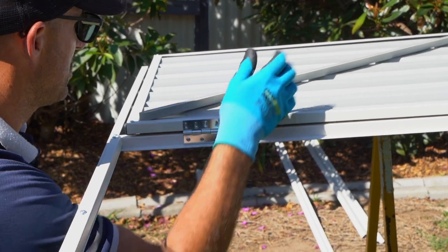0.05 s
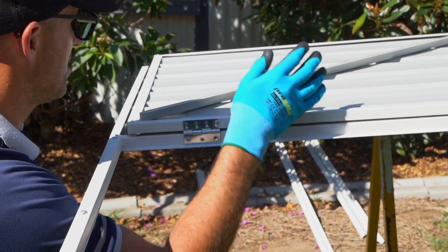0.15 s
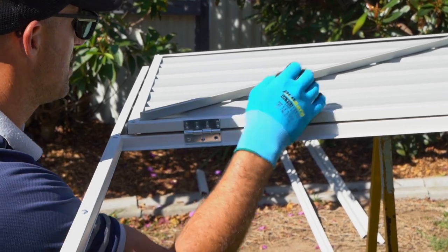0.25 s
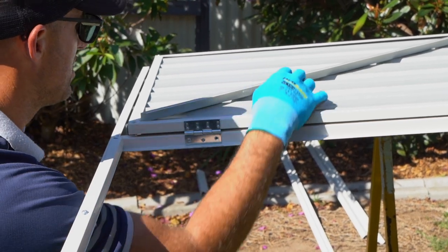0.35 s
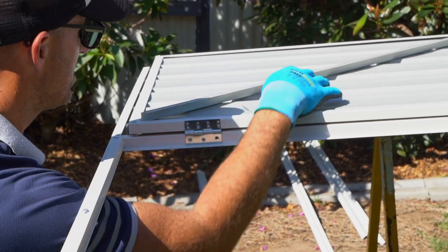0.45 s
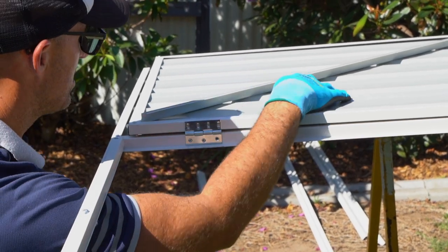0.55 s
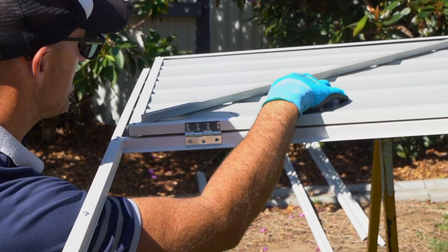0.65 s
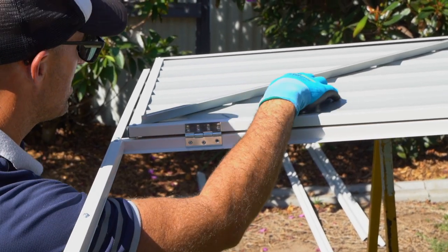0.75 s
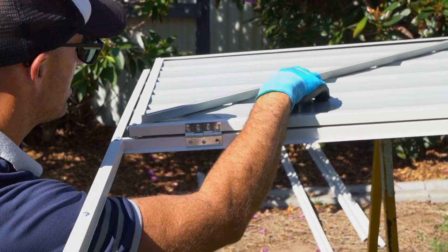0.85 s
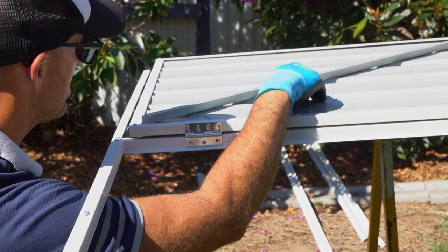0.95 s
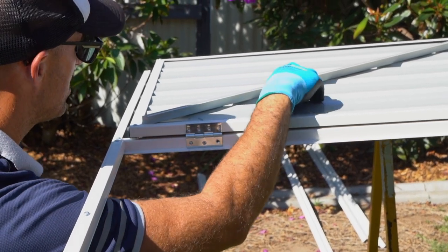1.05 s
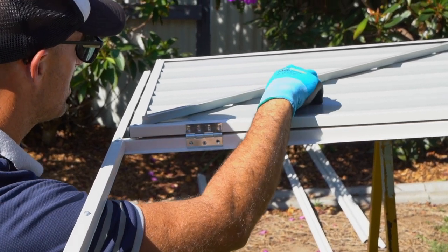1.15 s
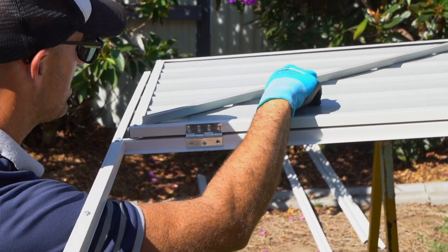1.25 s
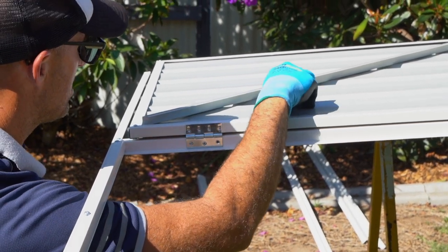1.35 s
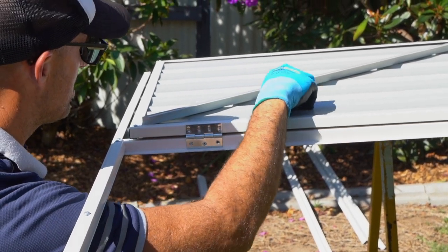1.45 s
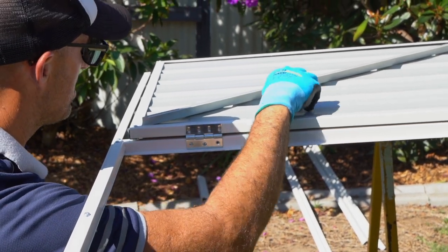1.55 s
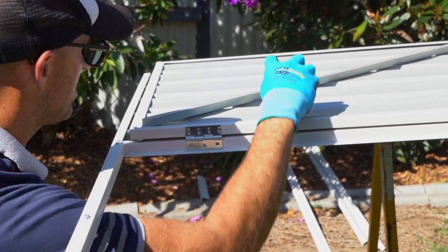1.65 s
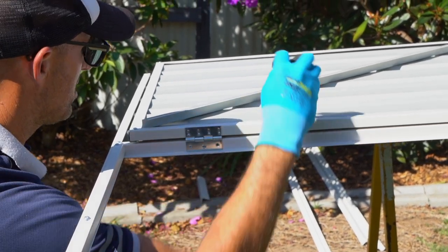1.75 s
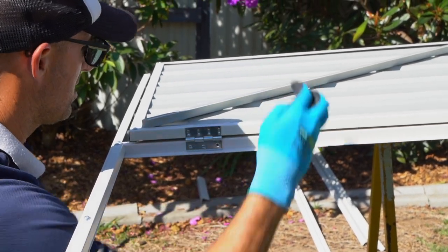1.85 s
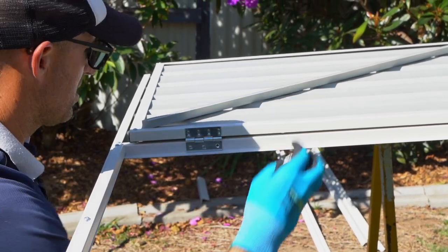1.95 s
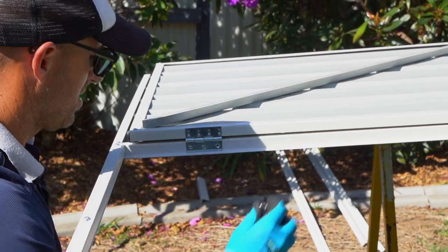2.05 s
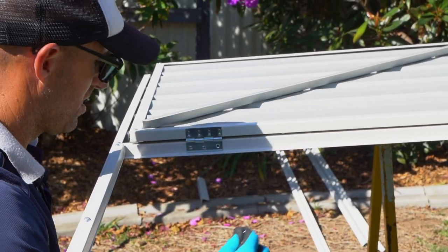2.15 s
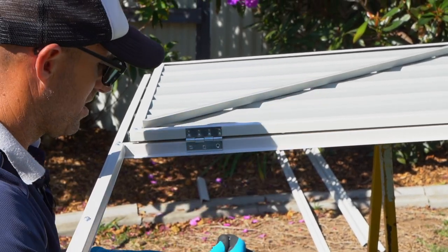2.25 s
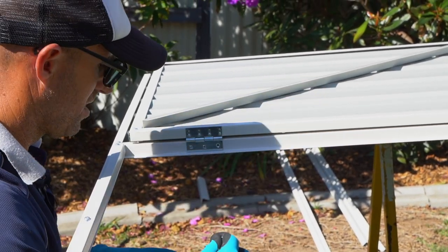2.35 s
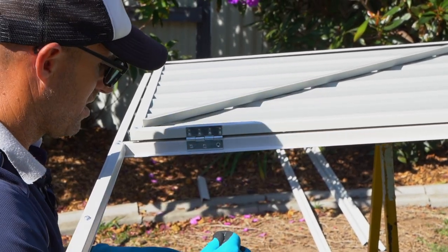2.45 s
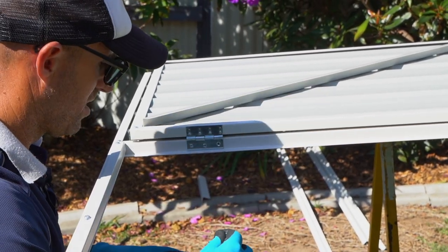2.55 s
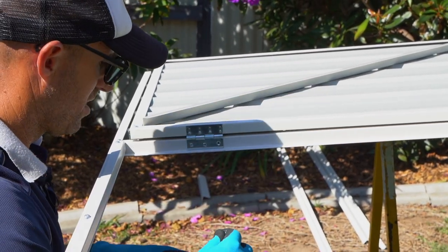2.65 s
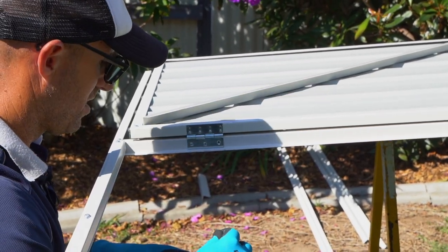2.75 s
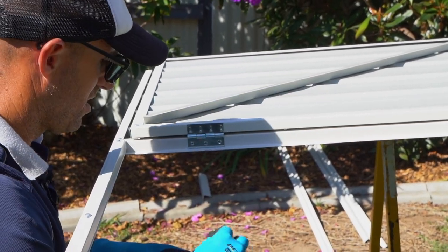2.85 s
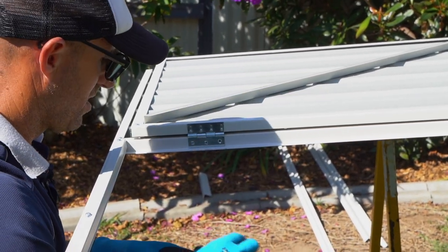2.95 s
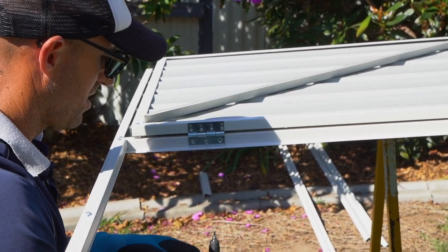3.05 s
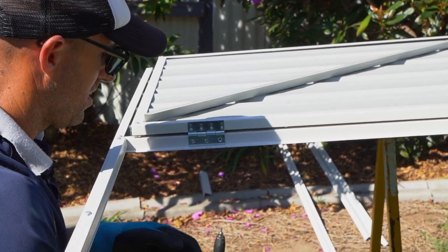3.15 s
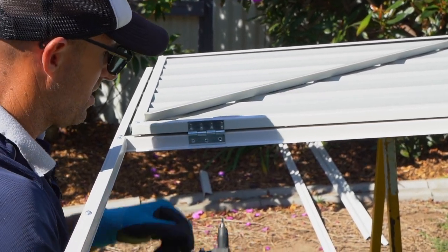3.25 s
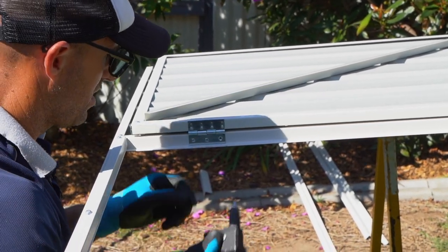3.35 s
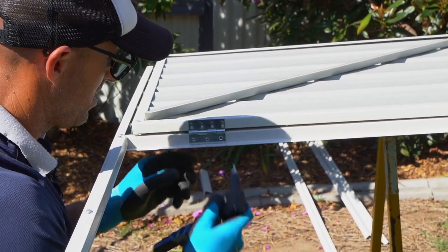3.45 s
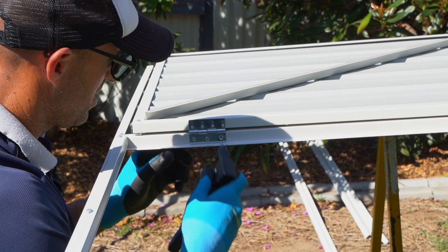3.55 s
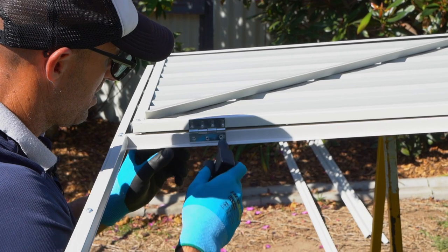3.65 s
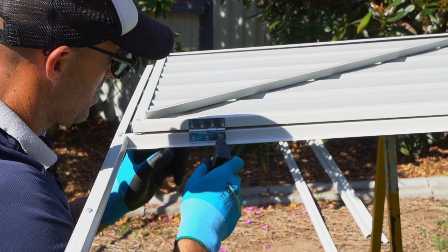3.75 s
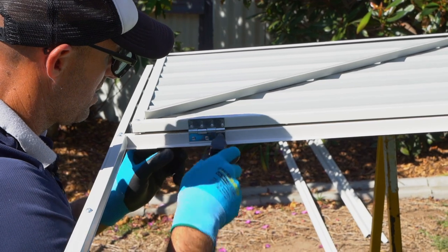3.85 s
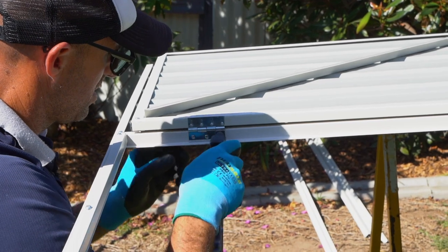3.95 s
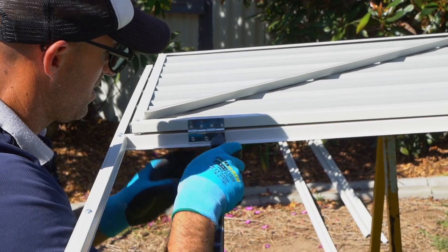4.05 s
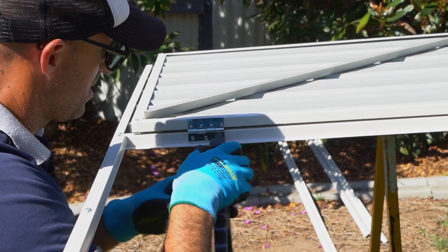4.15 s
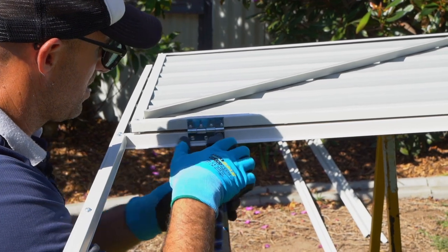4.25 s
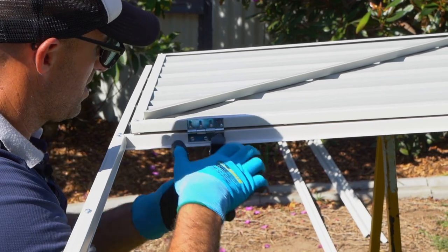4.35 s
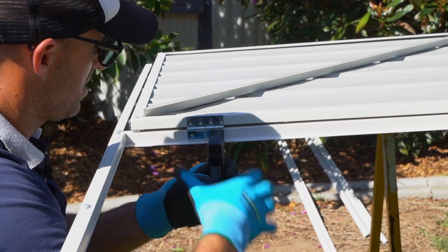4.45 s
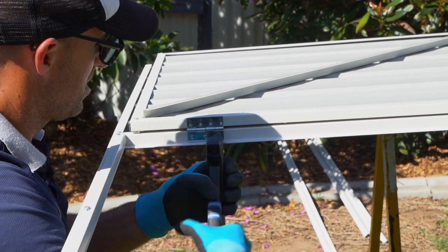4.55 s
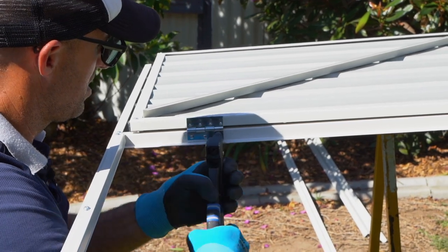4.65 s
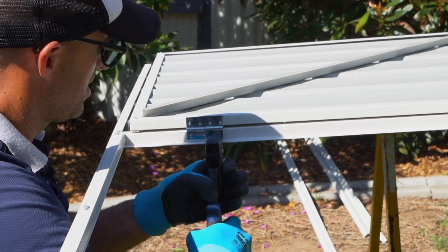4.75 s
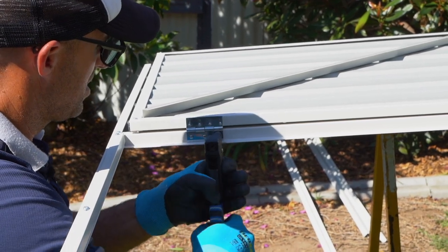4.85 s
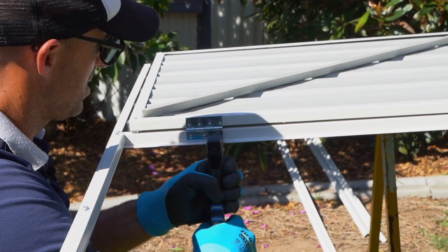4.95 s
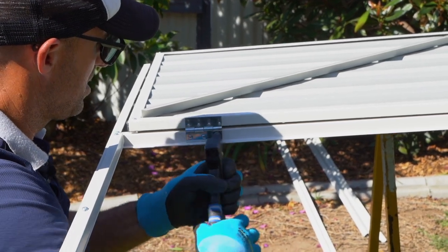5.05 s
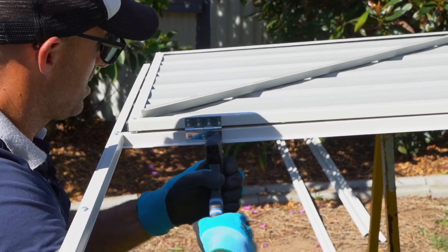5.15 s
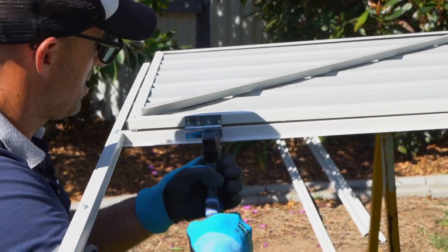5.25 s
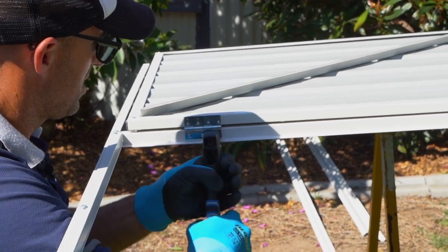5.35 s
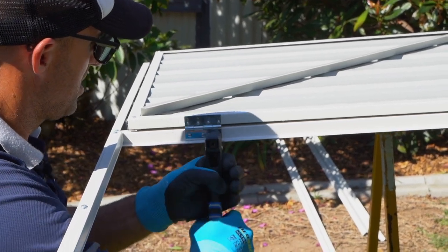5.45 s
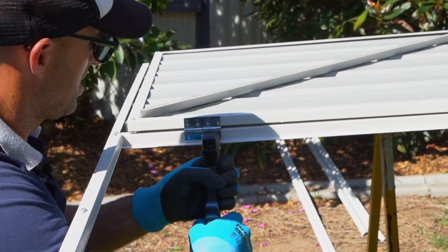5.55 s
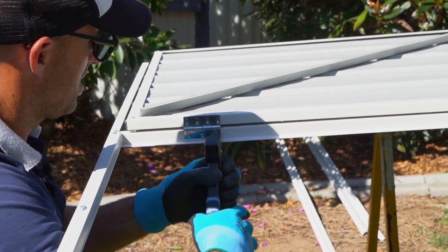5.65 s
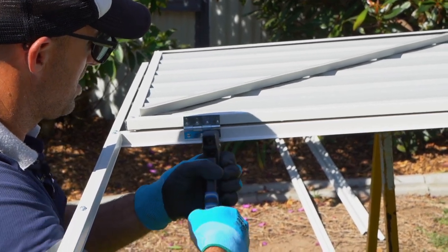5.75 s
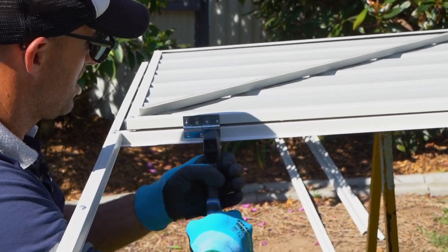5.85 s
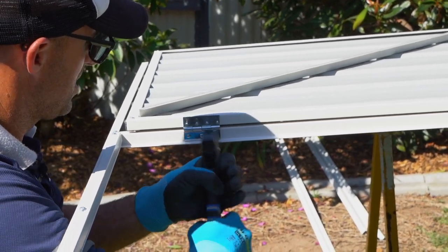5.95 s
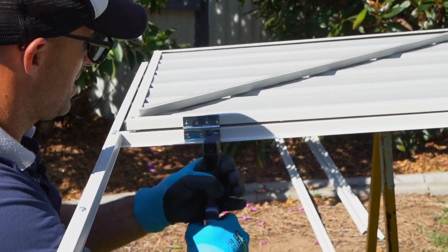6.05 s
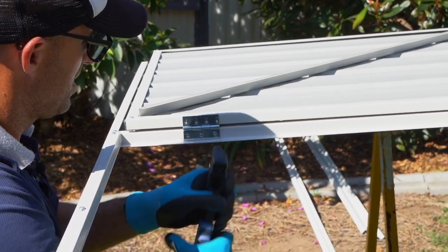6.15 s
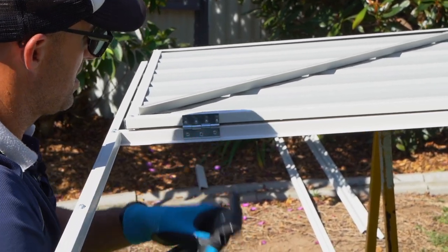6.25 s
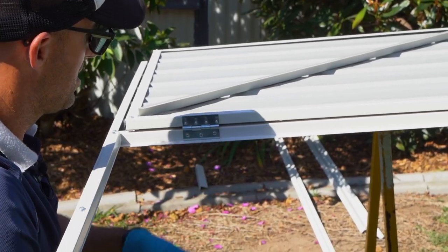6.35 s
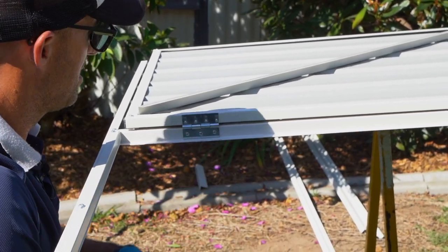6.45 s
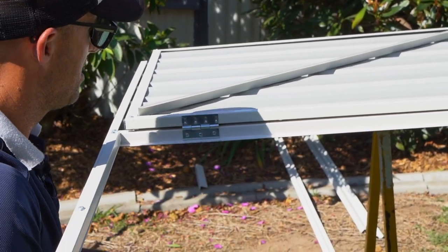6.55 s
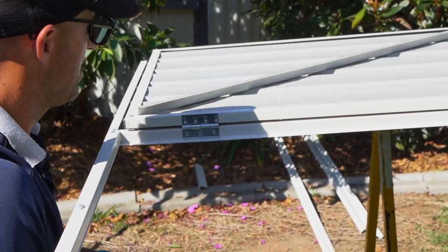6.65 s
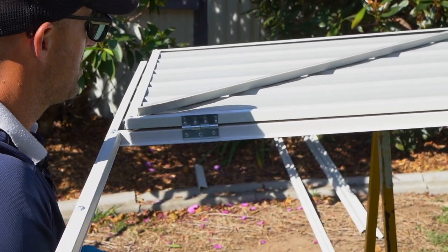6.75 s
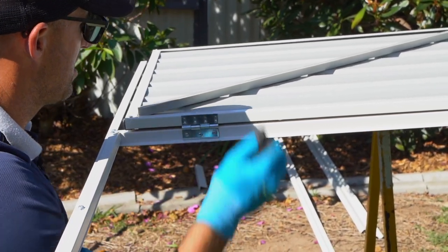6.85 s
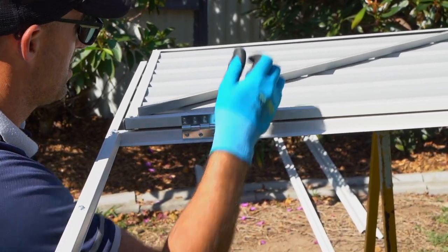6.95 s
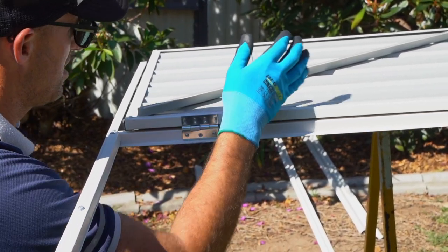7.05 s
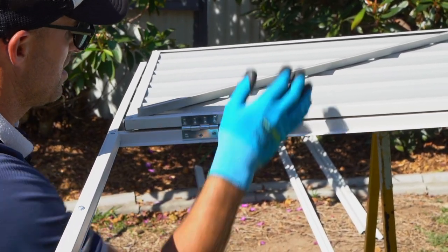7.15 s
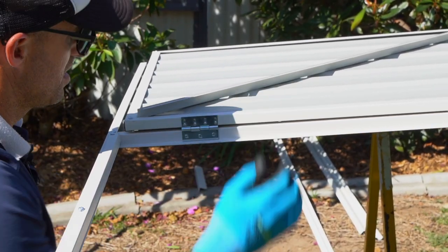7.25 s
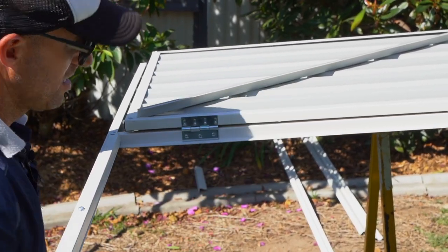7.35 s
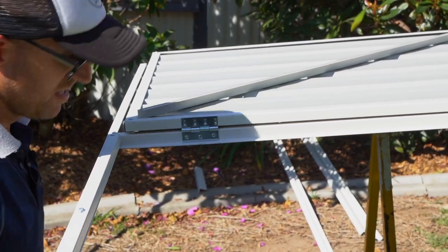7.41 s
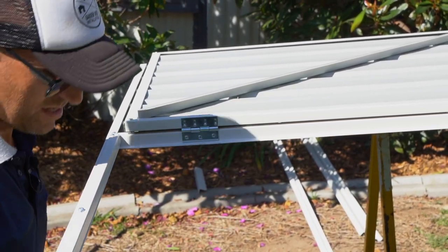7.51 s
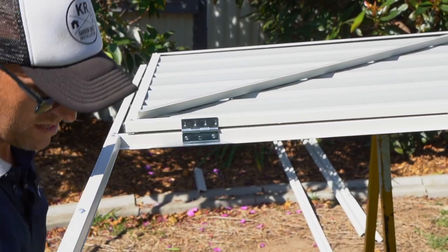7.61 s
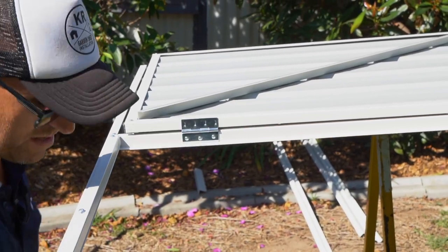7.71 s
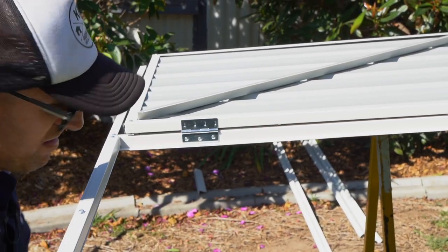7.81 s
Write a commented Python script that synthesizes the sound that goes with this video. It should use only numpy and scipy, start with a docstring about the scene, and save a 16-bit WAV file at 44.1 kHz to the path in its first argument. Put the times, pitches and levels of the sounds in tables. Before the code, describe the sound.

Quiet outdoor air with a low rumble, heard close in mono. From 0.55 to 1.6 s small metal taps, crisp and thinly ringing, land on a sheet panel with faint scraping; a short rasp and clink at 1.7 s lift the rivet away. Near silence follows, with a barely audible distant tone around 2.6 s. At 3.2 s a pin ticks and drops into a steel nose piece, bouncing fast; a bright tool click comes at 3.6. From 3.95 s soft knocks, dull creaks and jaw clicks appear, growing denser and stronger from 5.3 to 6.1 s with brief rattling. At 6.22 s a violent, very short crack overloads the microphone, distorting and choking momentarily as the panel rings. Rattles, knocks and bright clicks follow until 6.7 s, then soft glove rubbing. At 7.45 s a small piece clacks onto the sheet, taps again and slides faintly to the end, near 8 s.

```python
"""Outdoors at a sheet-metal shed, a gloved hand picks a rivet off a panel and feeds it into a hand rivet gun.
The gun knocks against the hinge, its jaws click, the frame creaks under the squeeze, and the mandrel snaps so
loudly that the microphone overloads. The gun rattles loose and a small metal piece drops on the panel. Knocks
and friction are shaped noise sent through the panel's resonances; loose steel parts and a squeak of the sheet
ring as paired sine waves, and filtered noise makes the gloves and the outdoor air."""
import sys
import numpy as np
from scipy import signal
from scipy.fft import rfft, irfft
from scipy.io import wavfile
from scipy.ndimage import uniform_filter1d

SR = 44100
rng = np.random.default_rng(int(sys.argv[2]) if len(sys.argv) > 2 else 0)


def wrap_up_sound(samples):
    """Save the sound to the file named by the first command line argument, as 16-bit audio."""
    columns = np.atleast_2d(samples).T
    # keep every value between -1 and 1, then stretch to whole-number steps
    tamed = np.clip(columns, -1, 1)
    steps = np.round(tamed * 32767).astype(np.int16)
    wavfile.write(sys.argv[1], SR, steps)


N = 347508
TIME = np.arange(N) / SR

# Events. "Relative level" means that the function using the table still adds its own dB setting.
# Small metal pieces landing and skidding on the sheet.
# Each row: start in seconds, relative level in dB, hardness in dB of extra treble.
PIECE_TAPS = [(0.5495, -34, 2), (0.5524, -38.5, -7.5), (0.6785, -41, -7), (0.7255, -35.5, 3),
              (0.857, -53, -9), (0.952, -56, -0.5), (1.117, -48, -3), (1.261, -44.5, -3), (1.395, -58, -2),
              (1.550, -47, 1), (1.6125, -45, 7.5), (1.8506, -63, 2), (2.0743, -69, 0), (2.2978, -67, 0),
              (7.4492, -32.5, -7), (7.529, -42.5, 7), (7.7246, -63, -3), (7.7995, -63, -3)]
# The gun knocking and slipping against the hinge.
# Each row: start in seconds, relative level in dB, hardness in dB of extra treble.
HINGE_KNOCKS = [(3.953, -42, 0.5), (4.131, -41.5, -3.5), (4.641, -47.5, -8), (5.061, -52.5, -11),
                (5.336, -37, 8), (5.473, -37, 0.5), (5.537, -41.5, -7), (5.894, -38.5, 8), (6.282, -40, 13),
                (6.376, -45, 12)]
# Dull creaks of the loaded frame. Each row: start in seconds, relative level in dB.
FRAME_CREAKS = [(4.234, -43), (4.308, -46), (4.717, -40), (4.957, -37.5), (5.181, -42.5), (5.384, -39),
                (5.537, -34), (5.677, -41.5), (5.792, -42.5), (6.093, -34.5)]
# Jaws and handles catch; with enough slack they seat a moment later.
# Each row: start in seconds, relative peak in dB, brightness in dB per decade of Hz, slack in seconds.
JAW_CLICKS = [(3.5819, -32, 11, .0059), (3.774, -50.5, -9, 0), (4.0141, -40, -6, 0.0026),
              (4.4966, -44, -13, 0.0023), (4.546, -45, -15, 0.0016), (4.6428, -37, 4, 0),
              (5.3098, -32, 1, 0.013), (5.464, -32.5, -6, 0.0037), (5.877, -35, 0, 0),
              (6.0128, -29.5, 1, 0.011), (6.4716, -36, 8, 0.0099), (6.5291, -37, 6, 0.0052),
              (6.6664, -50, -4.5, 0), (6.7013, -42, -3, 0.0021)]
# Ringing tones left by a touch: first a squeak of the sheet as the rivet scrapes it, then loose steel parts. #
# Each row: start in seconds, pitch in Hz, level in dB, time to fall 60 dB in seconds.
STEEL_CLINKS = [(1.687, 1380, -51, .5), (3.063, 3030, -73.5, .18), (3.5875, 2600, -35, .03),
                (3.587, 8130, -49, .035), (6.537, 8100, -41, 0.026)]
# Loose parts chattering inside the gun. Each row: middle in seconds, length in seconds, level in dB.
GUN_RATTLES = [(5.352, 0.033, -42), (5.478, 0.037, -44), (6.31, .09, -41), (6.48, 0.024, -48)]
# Fingers dragging the rivet over the sheet. Each row: time in seconds, relative level in dB.
RIVET_SCRAPE = [(0.8, -59), (0.878, -60), (1.038, -60), (1.188, -59.5), (1.262, -59), (1.388, -64),
                (1.588, -64), (1.79, -69), (2.078, -83), (2.3, -84)]
# The dropped piece sliding on. Each row: time in seconds, relative level in dB.
PIECE_SLIDE = [(7.62, -67), (7.678, -66.5), (7.88, -64.5)]
# Strain in the frame while the gun is pressed home. Each row: time in seconds, relative level in dB.
FRAME_STRAIN = [(4.0, -72), (4.13, -57), (4.56, -60.5), (5.6, -51.5), (5.87, -51.5), (6.2, -48.5)]
# Gloves brushing the sheet and shifting their grip on the gun.
# Each row: middle in seconds, length in seconds, level in dB.
GLOVE_RUBS = [(1.92, .18, -71), (3.54, .18, -70), (4.435, 0.63, -75), (5.673, .11, -60), (6.058, .14, -62),
              (6.77, 0.38, -69), (7.319, 0.079, -65.5)]
# The rivet's rim rasps off the sheet as it is lifted.
# A single row: middle in seconds, length in seconds, level in dB.
RIM_RASP = (1.71, .11, -51)

# Resonances. Each row: centre in Hz, width in Hz, height over its neighbours in dB.
# Panel and frame.
PANEL_PEAKS = [(123, 14, 7), (371, 10, 6), (404, 11, 9), (452.6, 18, 6), (579.7, 16, 6), (722, 6.2, 6),
               (829, 14, 6.5), (1020, 18, 2.5), (1130, 25, 4.5), (1373, 50, 3.5), (1650, 67, 6),
               (1860, 25, 5), (2524, 71, 3.5), (2734, 22, 6), (3050, 33, 6), (3430, 61, 2), (4180, 110, 3)]
# The steel gun.
GUN_PEAKS = [(1420, 250, 12), (2530, 210, 1.5), (3280, 400, 3.5), (5520, 340, 7), (8120, 160, 4.5)]
# The rivet's pin.
PIN_PEAKS = [(4970, 730, 11.6), (7100, 540, 10.7), (10500, 200, 8)]
# The breaking mandrel.
MANDREL_PEAKS = [(1320, 46, 7), (2800, 260, 10.5), (3380, 660, 4), (4170, 200, 5), (4730, 200, 4.4),
                 (5500, 600, 3.1), (6590, 360, 5.3), (9600, 760, 6.1), (11200, 240, 7)]
# A small piece striking the sheet.
PIECE_PEAKS = [(2850, 460, 1.5), (4130, 653, 6)]
# The gun's nose striking the hinge.
NOSE_PEAKS = [(1450, 300, 2), (2970, 650, 4.4)]
# How long panel and frame ring, before each use stretches or shortens it.
# Each row: pitch in Hz, time to fall 60 dB in seconds.
PANEL_RING_TIMES = [(150, 1.2), (450, 1.44), (900, 0.97), (1800, 0.53), (3600, 0.4), (7000, .25),
                    (14000, 0.44)]
# What the seated pin rings with. Each row: pitch in Hz, level in dB, time to fall 60 dB in seconds.
PIN_RING_TONES = [(1440, -66, .13), (3040, -63, .17), (4770, -59, .16), (10060, -57.5, 0.14)]

# Colours: the broad balance of bass and treble. Each row: pitch in Hz, relative strength in dB.
# Panel struck by a small piece.
TAP_BALANCE = [(88, -50.5), (150, -19.5), (235, -14.5), (422, -12), (649, -6), (730, -1), (1020, -12),
               (1420, -1), (1830, -3.5), (3350, 0), (4320, -5.5), (5570, -11), (7180, 0.5), (11700, -4.5),
               (16000, -31)]
# Panel struck by the gun.
KNOCK_BALANCE = [(59, -43.5), (100, -2), (283, -3.5), (415, 2), (648, -1.5), (1100, -11), (1200, -14),
                 (1390, -12.5), (1910, -14.5), (3050, -14.5), (5190, -20.5), (11900, -29), (16000, -47)]
# Frame under load.
CREAK_BALANCE = [(59, -29.5), (100, -15), (272, -13.5), (406, -6), (741, -13.5), (853, -2.5), (1200, -18.5),
                 (1330, -10.5), (1830, -23), (2470, -23), (5070, -40), (12000, -59.5), (15600, -98),
                 (22000, -120)]
# Panel ringing after the snap.
AFTER_BALANCE = [(60, -12), (120, -7.5), (180, -11), (260, -2.5), (400, -3.5), (700, -1.5), (1400, -2.5),
                 (2000, -1.5), (3000, -0.5), (5500, -6), (9000, -17), (16000, -28)]
# Rivet or small piece scraping on the sheet.
SCRAPE_BALANCE = [(200, -14), (400, -3), (800, -9.5), (1400, -2.5), (2000, -7), (3300, -4.5), (5200, -12.5),
                  (8800, -12.5), (13000, -36), (16000, -33)]
# Rivet's rim rasping on the sheet.
RASP_BALANCE = [(500, -14), (1400, -1), (3200, -2), (6000, -3), (9500, -1.5), (16000, -22)]
# Gun jaws and handles.
GUN_BALANCE = [(200, -22), (700, -13), (1400, -3.5), (2400, 2), (4200, -2), (7000, -16), (12000, -15),
               (16000, -30)]
# Pin ticking on the nose piece.
PIN_BALANCE = [(500, -22), (2000, -3.5), (5000, 2.5), (12000, -4), (16000, -16)]
# Mandrel breaking.
SNAP_BALANCE = [(60, -6.5), (110, -4.5), (200, -2.5), (400, 1), (1000, -2.5), (1700, -2), (4000, -8),
                (8000, -13.5), (16000, -25.5)]
# Metal contacts, also used for the rattles.
CONTACT_BALANCE = [(300, -13), (900, -2.5), (2000, -4), (4200, 0.5), (6500, -11.5), (11000, -11),
                   (16000, -23)]
# Gloves rubbing.
GLOVE_BALANCE = [(400, 2), (1500, 11.5), (4500, 3), (9000, -5.5), (16000, -10)]
# Outdoor air and low rumble.
YARD_BALANCE = [(12, -32.5), (20, -5.5), (63, -5), (110, -14), (234, -27.5), (270, -24.5), (434, -24.5),
                (485, -31), (718, -25.5), (780, -28), (1220, -33), (2260, -43), (2600, -47.5), (12100, -55),
                (16000, -66.5)]

SNAP_S = 6.2202
YARD_DB = -60.5
TOP_HZ = 16000
RING_DB = -5.5  # the panel's ring against the strength of a blow
# the seating click against the catch: louder by dB, duller by dB per decade of Hz
SEAT_DB, SEAT_DULLER_DB = 1.2, 11
# the pin hunts for the nose piece, then drops in and bounces to rest
PIN_SEAT_S, PIN_DB, PIN_DROP_S = 3.2317, -29.5, 0.02
HUNT_S, HUNT_DB, HUNT_RISE_DB_PER_S = 0.2, -62.5, 170
BOUNCE_S, BOUNCE_DB, BOUNCE_LOSS_DB = 0.0067, -11, 5
# the glove tightens just ahead of each slip on the hinge; level against the knock
GRIP_LEAD_S, GRIP_S, GRIP_DB = 0.022, 0.055, -24
# per dB of hardness: dB of ring bass lost, dB of contact gained, dB per decade of contact brightness gained
BASS_TRADE, CONTACT_GAIN, CONTACT_TILT = 0.2, 0.1, 0.7


def snap(crack_db=-3, crack_s=0.0059, ring_db=-25):
    """The mandrel breaks: a violent crack from the gun, and the whole panel rings as the load lets go."""
    out = np.zeros(N)
    t = TIME[:SR]
    noise = shape(rng.standard_normal(SR), SNAP_BALANCE, MANDREL_PEAKS)
    attack = 1 - np.exp(-t / 0.00091)
    crack = noise * np.exp(-(t / crack_s) ** 4) * attack
    add(out, SNAP_S, undb(crack_db) * crack / rms(crack[:SR // 100]))
    add(out, SNAP_S, undb(ring_db) * panel_ring(AFTER_BALANCE, stretch=0.85))
    return out


def gun(jaws_db=2):
    """Jaws and handles click as they take up and let go; loose parts ring on, and the sheet squeaks once."""
    out = np.zeros(N)
    for s, db, bright_db, slack_s in JAW_CLICKS:
        contacts = [(s, db, bright_db)]
        if slack_s > 0.003:  # with less slack there is no second click
            contacts.append((s + slack_s, db + SEAT_DB, bright_db - SEAT_DULLER_DB))
        for at_s, peak_db, tilt_db in contacts:
            colour = tilted(GUN_BALANCE, tilt_db)
            sound = click(colour, GUN_PEAKS, fall_s=0.0011, tail_s=0.012)
            add(out, at_s, undb(peak_db + jaws_db) * sound)
    for s, hz, db, t60 in STEEL_CLINKS:
        add(out, s, clink(hz, db, t60))
    return out


def rattles():
    """Pin, jaws and spring bounce against each other in quick, uneven bursts."""
    contact = click(CONTACT_BALANCE, [(3000, 900, 4)], fall_s=0.0013, tail_s=0.006)
    chatter = signal.fftconvolve(slips(per_s=260, spread_db=2.0), contact)[:N]
    return chatter / rms(chatter) * swells(GUN_RATTLES)


def pin(ring_db=-27, count=6):
    """The pin ticks and sings round the mouth of the nose piece, drops in ringing and bounces ever more weakly."""
    def tick():
        """One touch of the pin on the nose piece: a short steel click."""
        return click(PIN_BALANCE, PIN_PEAKS, fall_s=0.0013, tail_s=0.016)

    ring = sum(clink(*mode) for mode in PIN_RING_TONES)
    singing_tick = tick() + undb(ring_db) * ring[:SR // 10] / np.abs(ring).max()
    hunt = signal.fftconvolve(slips(per_s=300, spread_db=2), singing_tick)[:N]
    found_s = PIN_SEAT_S - PIN_DROP_S
    hunt_start_db = HUNT_DB - HUNT_RISE_DB_PER_S * HUNT_S
    out = hunt / rms(hunt) * follow([(found_s - HUNT_S, hunt_start_db), (found_s, HUNT_DB)])
    add(out, PIN_SEAT_S, undb(PIN_DB) * tick())
    add(out, PIN_SEAT_S, ring)
    for k in range(count):
        bounce_s = BOUNCE_S * (k + 1 + rng.uniform(-0.18, 0.18))
        add(out, PIN_SEAT_S + bounce_s, undb(PIN_DB + BOUNCE_DB - BOUNCE_LOSS_DB * k) * tick())
    return out


def blows(table, colour, piece, stretch, bass_db, treble_db, contact_db, fall_s):
    """The striking piece clicks, then the panel rings; a harder contact is brighter and trades bass for treble."""
    out = np.zeros(N)
    for s, db, hard_db in table:
        contact = tilted(CONTACT_BALANCE, CONTACT_TILT * hard_db)
        strike = click(contact, piece, fall_s, tail_s=0.0044)
        add(out, s, undb(db + contact_db + CONTACT_GAIN * hard_db) * strike)
        levels_db = (bass_db - BASS_TRADE * hard_db, 0, treble_db + hard_db)
        for part, part_db in zip(registers(panel_ring(colour, stretch, piece)), levels_db):
            add(out, s, undb(db + RING_DB + part_db) * part / rms(part[:SR // 40]))
    return out


def creaks(creak_db=-8.5, tick_db=-8):
    """The frame gives in small jerks: a dull tick, then mainly its low modes ring, the hinge rail above all."""
    out = np.zeros(N)
    rail_peaks = [(865, 80, 4.5), (2620, 1700, 5)]
    for s, db in FRAME_CREAKS:
        tick = click(CREAK_BALANCE, [(2600, 1700, 9)], fall_s=0.003, tail_s=0.01)
        add(out, s, undb(db + tick_db) * tick)
        ring = panel_ring(CREAK_BALANCE, stretch=0.38, contact=rail_peaks, build_cycles=1.9)
        add(out, s, undb(db + creak_db) * ring)
    return out


def rasp():
    """The rivet's rim sticks and slips densely, ringing mainly the upper part of the panel's sound."""
    ring = panel_ring(RASP_BALANCE, stretch=0.2, contact=[(1400, 90, 6)])
    grit = signal.fftconvolve(slips(per_s=1500, spread_db=2.5), ring)[:N]
    return grit / rms(grit) * swells([RIM_RASP])


def friction(scrape_db=4.5, slide_db=0, strain_db=-5.5):
    """Tiny slips make metal scrape over the sheet, the frame murmur under load and the gloves rub."""
    sheet_ring = panel_ring(SCRAPE_BALANCE, stretch=0.34, contact=[(1427, 80, 3.1)])
    sheet = signal.fftconvolve(slips(per_s=550, spread_db=4.8), sheet_ring)[:N]
    frame_ring = panel_ring(CREAK_BALANCE, stretch=0.2)
    frame = signal.fftconvolve(slips(per_s=280, spread_db=2), frame_ring)[:N]
    gloves = shape(slips(per_s=12000, spread_db=3.5), GLOVE_BALANCE)
    scraping = undb(scrape_db) * follow(RIVET_SCRAPE) + undb(slide_db) * follow(PIECE_SLIDE)
    straining = undb(strain_db) * follow(FRAME_STRAIN)
    # the first knock has no grip ahead of it
    grips = [(s - GRIP_LEAD_S, GRIP_S, db + GRIP_DB) for s, db, _ in HINGE_KNOCKS[1:]]
    rubbing = swells([*GLOVE_RUBS, *grips])
    return sheet / rms(sheet) * scraping + frame / rms(frame) * straining + gloves * rubbing


def yard(tone_hz=712, tone_db=-76, tone_s=2.63, tone_length_s=0.32):
    """Quiet outdoor air over a low rumble; far off, a faint wavering tone of narrow noise swells and fades."""
    air = undb(YARD_DB) * shape(rng.standard_normal(N), YARD_BALANCE)
    narrow = [(0.95 * tone_hz, -30), (tone_hz, 0), (1.05 * tone_hz, -30), (2 * tone_hz, -70)]
    tone = shape(rng.standard_normal(N), narrow)
    return air + tone * swells([(tone_s, tone_length_s, tone_db)])


def panel_ring(colour, stretch, contact=(), build_cycles=4):
    """The panel's crowded modes after a blow: highs build up faster, low modes swell in and hang on."""
    t = TIME[:SR]
    spectrum = rfft(shape(rng.standard_normal(SR), colour, [*PANEL_PEAKS, *contact]))
    hz, t60 = np.transpose(PANEL_RING_TIMES)
    axis = log_hz(SR)
    # overlapping bands, one around each pitch of the ring-time table
    weights = np.array([np.interp(axis, np.log(hz), row) for row in np.eye(len(hz))])
    bands = irfft(spectrum * weights, SR)
    swell = 1 - np.exp(-t * hz[:, None] / build_cycles)
    decay = np.exp(-np.log(1000) * t / (stretch * t60[:, None]))
    ring = np.sum(bands * swell * decay, axis=0)
    return ring / rms(ring[:SR // 20])


def click(colour, modes, fall_s, tail_s):
    """Steel on steel, damped by the hand: a brief burst and a faint rattle; peak 1."""
    t = TIME[:SR // 10]
    tail = undb(-20) * np.exp(-t / tail_s)
    attack = 1 - np.exp(-t / 0.00027)
    burst = shape(rng.standard_normal(len(t)), colour, modes) * (np.exp(-t / fall_s) + tail) * attack
    return burst / np.abs(burst).max()


def clink(hz, db, t60):
    """A steel part that is not quite round rings with a close pair of modes."""
    t = TIME[:SR // 2]
    near_hz = hz * (1 + rng.uniform(0.0045, 0.012))
    pair = np.sin(2 * np.pi * hz * t) + 0.5 * np.sin(2 * np.pi * near_hz * t)
    return undb(db) * pair * np.exp(-np.log(1000) * t / t60)


def slips(per_s, spread_db):
    """Tiny stick-slip releases of uneven size, at random moments."""
    moments = rng.random(N) < per_s / SR
    sizes = rng.standard_normal(N) * undb(spread_db * np.minimum(rng.exponential(size=N), 4))
    return moments * sizes


def follow(curve):
    """Gain along a curve of seconds and dB, silent outside it and smoothed over 20 ms."""
    s, db = np.transpose(curve)
    return uniform_filter1d(undb(np.interp(TIME, s, db, left=-140, right=-140)), SR // 50)


def swells(table):
    """Gain made of bell-shaped swells, each with a middle in seconds, a length in seconds and a dB level."""
    return sum(undb(db) * np.exp(-(2 * (TIME - s) / length) ** 2) for s, length, db in table)


def shape(x, colour, modes=()):
    """Give a signal a broad colour and resonance peaks; rms 1."""
    axis = log_hz(len(x))
    hz, db = np.transpose(colour)
    gain = undb(np.interp(axis, np.log(hz), db))
    for centre, width, peak_db in modes:
        offset = 2 * (np.exp(axis) - centre) / width
        gain = gain * (1 + (undb(peak_db) - 1) / (1 + offset ** 2))
    y = irfft(rfft(x) * gain, len(x))
    return y / rms(y)


def tilted(colour, tilt_db):
    """Brighten a colour by so many dB per decade of Hz."""
    return [(hz, level + tilt_db * np.log10(hz)) for hz, level in colour]


def registers(x, edges_hz=(1100, 5000)):
    """Split into bass, middle and treble."""
    splits = ((edges_hz[0], "low"), (edges_hz, "band"), (edges_hz[1], "high"))
    return [signal.sosfilt(signal.butter(4, edge, kind, fs=SR, output="sos"), x) for edge, kind in splits]


def log_hz(size):
    """Log frequency of each bin of a transform."""
    return np.log(np.maximum(np.fft.rfftfreq(size, 1 / SR), 1))


def undb(db):
    """Decibels to gain."""
    return 10 ** (np.asarray(db) / 20)


def rms(x):
    """Root mean square: the average strength of a signal."""
    return np.sqrt(np.mean(x ** 2) + 1e-20)


def add(track, s, sound):
    """Mix a sound into a track at time s."""
    start = max(int(s * SR), 0)
    track[start:start + len(sound)] += sound[:N - start]


def scene():
    """All sources at the one microphone."""
    taps = blows(PIECE_TAPS, TAP_BALANCE, PIECE_PEAKS, stretch=0.67,
                 bass_db=-11.5, treble_db=-5, contact_db=14, fall_s=0.0022)
    knocks = blows(HINGE_KNOCKS, KNOCK_BALANCE, NOSE_PEAKS, stretch=0.56,
                   bass_db=-3, treble_db=-11.5, contact_db=13, fall_s=0.0025)
    handling = gun() + rattles() + pin()
    panel = taps + knocks + creaks() + rasp() + friction()
    return (snap() + handling + panel + yard())[None]


def record(dry, sag=0.36, recover_s=0.072, charge_gain=48, coupling_hz=1.3):
    """Overload drags the preamplifier's bias against one rail and chokes the sound until it recovers."""
    rail = 0.31  # the largest level the preamplifier can pass
    keep = np.exp(-1 / (recover_s * SR))
    charge = signal.lfilter([1 - keep], [1, -keep], np.abs(dry) > rail)
    # the bias holds for the first few milliseconds of overload, then collapses
    bias = sag * np.tanh(charge_gain * np.roll(charge, SR // 300))
    clipped = np.clip(dry - bias, -rail, rail)
    # the coupling capacitor swings the offset back through zero
    coupled = signal.sosfilt(signal.butter(1, coupling_hz, "high", fs=SR, output="sos"), clipped)
    # nothing much passes above the top frequency
    return signal.sosfiltfilt(signal.ellip(8, 0.1, 50, TOP_HZ, fs=SR, output="sos"), coupled)


dry = scene()
out = record(dry)
wrap_up_sound(out)
```